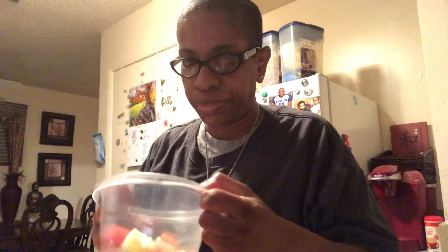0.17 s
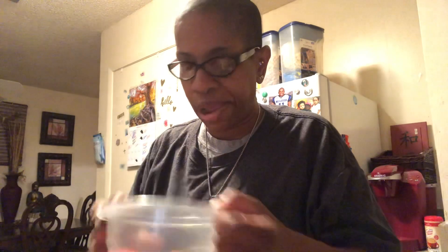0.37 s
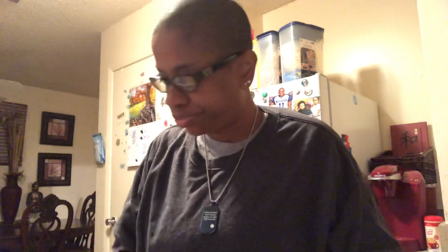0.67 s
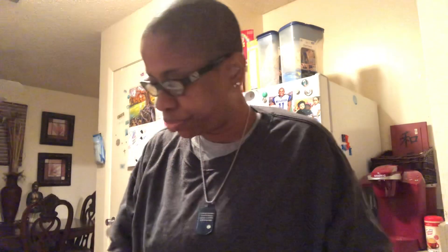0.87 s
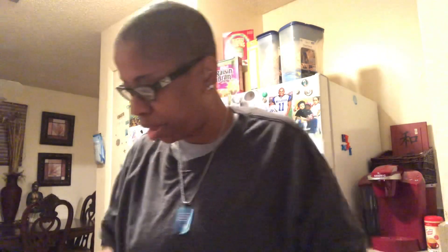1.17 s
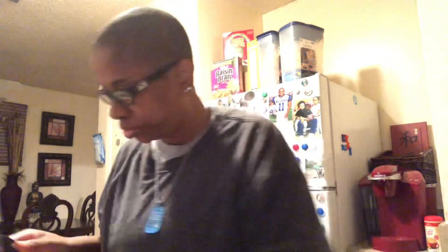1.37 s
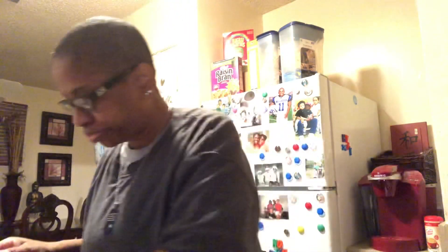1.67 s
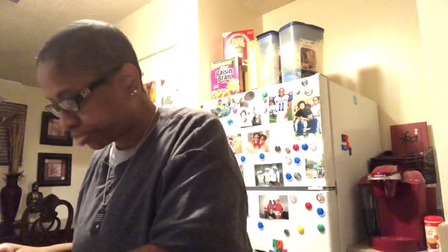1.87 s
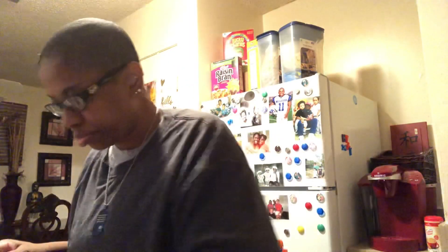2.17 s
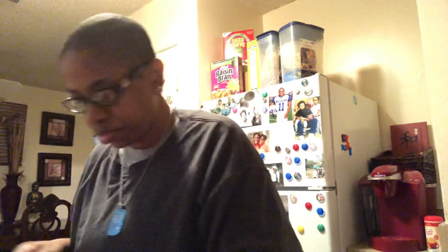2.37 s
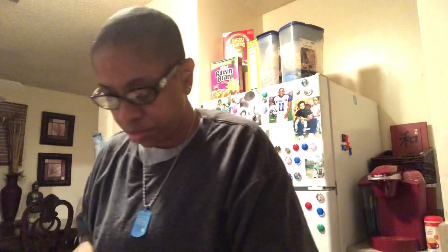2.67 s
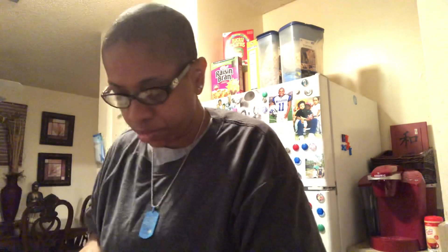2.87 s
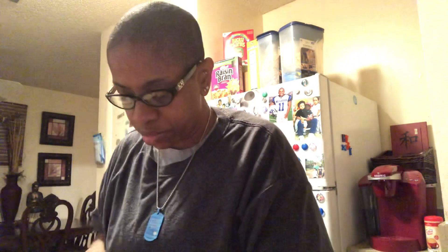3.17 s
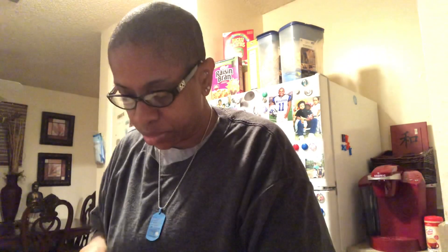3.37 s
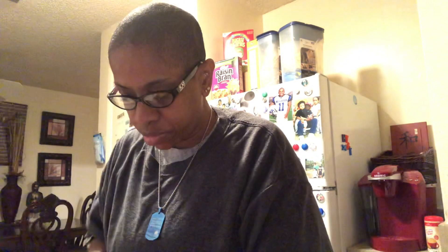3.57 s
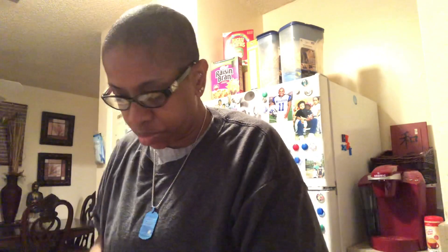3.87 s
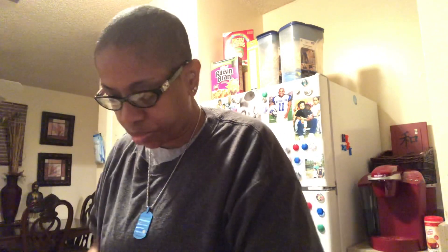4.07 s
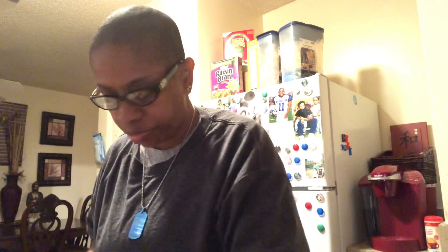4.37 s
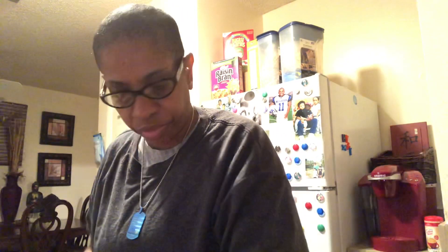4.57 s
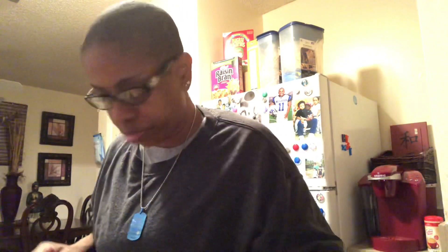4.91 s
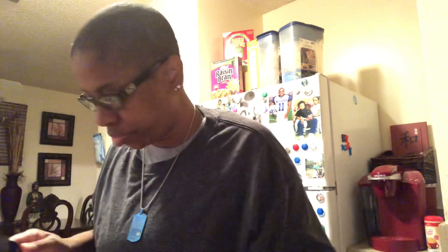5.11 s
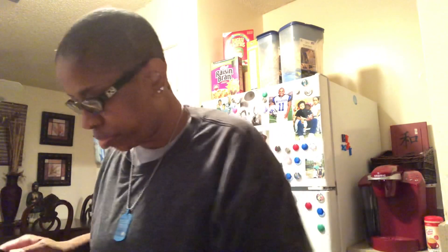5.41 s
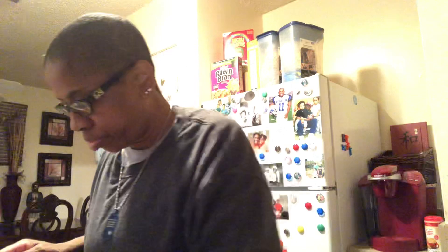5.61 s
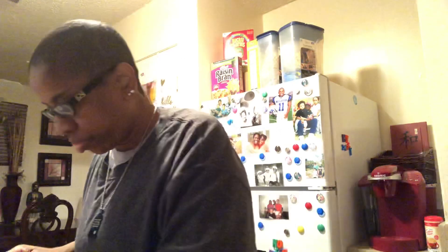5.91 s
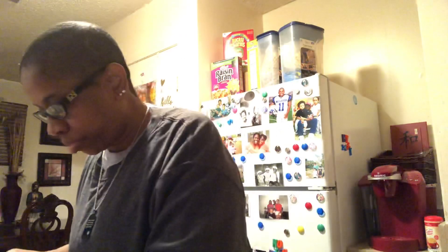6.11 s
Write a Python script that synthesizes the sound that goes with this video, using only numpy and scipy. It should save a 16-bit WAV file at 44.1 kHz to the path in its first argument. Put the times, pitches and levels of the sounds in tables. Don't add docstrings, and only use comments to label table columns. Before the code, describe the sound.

A microwave oven runs throughout in a small, lively kitchen: low electrical buzz, a steady fan tone and soft air rush. Lids tick faintly, then a plastic tub is set down with a short hollow knock. Light fingertip taps follow. Around the middle a hard object cracks loudly on the counter with a quick rattle of bounces, followed by soft plastic rubbing. Faint taps come near the end. A small, close microphone gives thin deep bass.

```python
import sys
import numpy as np
from scipy import signal
from scipy.fft import rfft, irfft
from scipy.io import wavfile
from scipy.ndimage import uniform_filter1d

SR = 44100
rng = np.random.default_rng(int(sys.argv[2]) if len(sys.argv) > 2 else 0)


def attenuation_scalar(level_db):
    decades = np.asarray(level_db, float) / 20
    return 10 ** decades


def wav_record(signal):
    frames = np.transpose(np.atleast_2d(signal))
    bounded = np.clip(frames, -1, 1)
    quanta = np.round(bounded * 32767).astype(np.int16)
    wavfile.write(sys.argv[1], SR, quanta)


N = 275625

MAINS_HZ = 60.007
# multiple of the mains, level in dB.
BUZZ_LINES = [(2, -41), (3, -51.5), (4, -41.5), (5, -64), (6, -56), (7, -60), (8, -60.5), (10, -64),
              (82, -84.5), (102, -92), (104, -82.5), (108, -83.5), (120, -89), (170, -89.5)]
# frequency in Hz, level in dB.
FAINT_LINES = [(600, -92), (1200, -96), (2500, -85), (4000, -86), (5500, -100), (7000, -102), (9000, -108),
               (11000, -109), (15500, -114)]
# frequency in Hz, level in dB.
FAN_TONES = [(157.08, -39), (314.16, -62), (570.5, -69), (706.9, -68), (785.4, -67), (826, -69),
             (1099.6, -67), (1256.7, -71)]

# start in seconds, crack level in dB, ring level in dB.
TUB_CONTACTS = [
    (.6770, -11, -7),
    (.6800, -14.5, -28),
    (.6842, -12.5, -19),
]
# start in seconds, crack level in dB, ring level in dB.
HARD_CONTACTS = [
    (3.4360, -35, -23),
    (3.4377, -7, -16),
    (3.4396, -8, -5.5),
    (3.4425, -20.5, -10.5),
    (3.4445, -15, -11),
    (3.454, -19, -17.5),
    (3.467, -37, -33),
]
# frequency in Hz, level in dB, 60 dB decay time in seconds.
TUB_MODES = [(360, -15.5, 0.045), (925, -19.5, 0.068), (2040, -12, 0.013), (2470, -2.5, 0.0068),
             (2720, -9, 0.0061), (3250, -7.5, 0.0082)]
# frequency in Hz, level in dB, 60 dB decay time in seconds.
HARD_MODES = [(350, 1.5, 0.032), (527, -2.5, 0.091), (1070, -13.5, 0.069), (1287, -7, 0.03),
              (1552, 5, 0.017), (2270, -5, 0.0084), (3590, -1, 0.0086)]
# frequency in Hz, level in dB per Hz.
TUB_CRACK_SPECTRUM = [(80, -19), (300, 0.5), (650, -1), (1500, -6.5), (2600, -4.5), (4500, -9.5),
                      (7800, -17.5), (9000, -23.5), (16000, -28)]
# frequency in Hz, level in dB per Hz.
HARD_CRACK_SPECTRUM = [(80, -28), (300, 3), (750, -5.5), (1200, 2), (2500, -3), (3600, -9.5), (5000, -15),
                       (8000, -21), (10500, -35), (16000, -42)]
# start in seconds, strength in dB, extra level of the upper modes in dB.
COUNTER_THUDS = [(.683, -17, -1), (.749, -34, -7), (1.172, -48, -5), (1.602, -48, -14), (2.379, -41, -13),
                 (2.627, -47, -5), (3.103, -40, -14), (3.441, -23, -7), (3.892, -42, -8), (5.145, -44, -12),
                 (5.236, -41, -11)]
# frequency in Hz, level in dB, 60 dB decay time in seconds.
COUNTER_MODES = [(75.3, -11, 0.3), (108.8, 1, 0.14), (141.6, -10, 0.23), (181.4, -8, 0.14),
                 (240.3, 5.5, 0.072), (312, -24, 0.24)]

# start in seconds, peak level in dB, centre in Hz.
LID_TICKS = [(.2306, -36.5, 7650), (.2594, -47, 8700), (.3015, -48, 5800), (.312, -44, 6500),
             (.322, -46, 3380), (.3472, -56, 5000), (.877, -47, 3970), (1.067, -61, 11000),
             (1.099, -56, 10000), (1.108, -46, 6840), (1.177, -53, 4240), (1.361, -66, 10000),
             (1.6238, -52.5, 6760), (2.3741, -56, 5000), (3.103, -63, 7500), (5.117, -61, 12000),
             (5.238, -62, 8000), (6.235, -57, 9000)]
# start in seconds, peak level in dB, centre in Hz.
FINGER_TAPS = [
    (.8708, -36.5, 3450),
    (1.1599, -43.5, 2600),
    (5.2271, -43.5, 6300),
]
TICK_SPREAD, TICK_T60_S = 0.38, 0.023
TAP_SPREAD, TAP_T60_S = 1.3, 0.046
# start of full contact in seconds, hold in seconds, level in dB.
HAND_STROKES = [
    (1.29, .08, -74),
    (3.26, .04, -82),
    (3.335, .02, -72),
    (3.38, .01, -79),
    (3.43, .02, -56),
    (3.668, .095, -65.5),
    (3.86, .05, -73),
]
BRUSH_RISE_DB_PER_S, BRUSH_FALL_DB_PER_S = 260, 420
# start in seconds, length in seconds, centre in Hz,
# width in Hz, level in dB.
PLASTIC_SQUEAKS = [(2.599, 0.063, 3480, 300, -59), (3.329, 0.14, 7300, 1300, -64),
                   (3.64, .085, 9100, 300, -76), (3.722, .05, 10600, 400, -77),
                   (3.73, 0.071, 7300, 500, -72), (3.77, 0.031, 12200, 400, -82)]

# frequency in Hz, level in dB per Hz.
AIR_SPECTRUM = [(25, -42), (45, -5.5), (75, -6.5), (110, 3), (200, -4), (300, -6), (650, -12),
                (1300, -14.5), (2100, -18), (3000, -27), (4500, -29), (7500, -40.5), (10000, -44.5),
                (16000, -49.5)]
AIR_DB = -45.5
# frequency in Hz, width in Hz, lift in dB.
DUCT_RESONANCES = [(356.7, 99, 10), (547.7, 19.4, 10.5), (828.4, 25, 11), (1013, 400, 5), (1236, 16.6, 11),
                   (1693, 91, 9), (1865, 88, 8.5), (2390, 86, 5), (3336, 1100, 8.5), (5100, 440, 0),
                   (6600, 280, 5)]
# frequency in Hz, 60 dB decay time in seconds.
KITCHEN_DECAY = [(100, 0.55), (500, 0.51), (1200, 0.49), (3000, 0.37), (7000, 0.34), (10000, 0.27),
                 (15000, 0.25)]


def read(points, hz):
    f, value = np.transpose(points)
    return np.interp(np.log(hz + 1), np.log(f + 1), value)


def evened(x):
    return x / np.sqrt(np.mean(x ** 2) + 1e-20)


def add(mix, s, sound):
    part = mix[round(s * SR):][:len(sound)]
    part += sound[:len(part)]


def coloured(size, gain):
    spectrum = rfft(rng.standard_normal(size)) * gain(np.fft.rfftfreq(size, 1 / SR))
    return evened(irfft(spectrum, size))


def resonance(hz, centre, width):
    return 1 / (1 + (2 * (hz - centre) / width) ** 2)


def click(gain):
    log_gain = np.log(gain(abs(np.fft.fftfreq(4096, 1 / SR))) + 1e-5)
    pulse = np.fft.ifft(np.exp(np.conj(signal.hilbert(log_gain)))).real
    return pulse / abs(pulse).max()


def ring(modes, rise_s):
    t = np.arange(SR // 3) / SR
    x = np.zeros(len(t))
    for k, (hz, db, t60) in enumerate(modes):
        x += (-1) ** k * attenuation_scalar(db - 60 * t / t60) * np.sin(2 * np.pi * hz * t)
    x = x * (1 - np.exp(-t / rise_s)) ** 2
    return x / abs(x).max()


def echoed(x, room_db):
    taps = np.zeros(SR // 3)
    at = np.arange(120, len(taps) - 12, 12)
    taps[at + rng.integers(0, 12, len(at))] = rng.choice([-1., 1.], len(at))
    hz, t, z = signal.stft(taps, SR, nperseg=256)
    decay = attenuation_scalar(-60 * t / read(KITCHEN_DECAY, hz)[:, None])
    tail = signal.istft(z * decay, SR, nperseg=256)[1]
    tail = attenuation_scalar(room_db) * tail / np.linalg.norm(tail)
    return signal.fftconvolve(x, np.r_[1, tail[1:]])


def hum():
    order = np.arange(11, 262)
    faint_db = read(FAINT_LINES, order * MAINS_HZ) + 3.3 * rng.standard_normal(len(order))
    levels = dict(zip(order, faint_db))
    levels |= {round(k): db for k, db in BUZZ_LINES}
    turn, t = np.linspace(0, 1, 16385), np.arange(N) / SR
    cycle = sum(attenuation_scalar(db) * np.cos(2 * np.pi * (k * turn + rng.random())) for k, db in levels.items())
    buzz = np.interp(MAINS_HZ * t % 1, turn, cycle)
    fan = sum(attenuation_scalar(db) * np.cos(2 * np.pi * (hz * t + rng.random())) for hz, db in FAN_TONES)
    return np.sqrt(2) * (buzz + fan)


def knock(contacts, modes, crack, rattle_db, room_db):
    out, rings, t = np.zeros(N), np.zeros(N), np.arange(4096) / SR
    rattle_shape = np.exp(-t / 0.003) * np.minimum(t / 0.0006, 1)

    def colour(hz):
        return attenuation_scalar(read(crack, hz))

    for s, db, ring_db in contacts:
        add(out, s, attenuation_scalar(db) * echoed(click(colour), room_db))
        add(out, s, attenuation_scalar(db + rattle_db) * coloured(4096, colour) * rattle_shape)
        add(rings, s, attenuation_scalar(ring_db) * ring(modes, 0.0004))
    return out + echoed(rings, -20.5)[:N]


def thuds():
    out = np.zeros(N)
    for s, db, upper_db in COUNTER_THUDS:
        modes = [(hz, d + upper_db * (hz > 150), t60) for hz, d, t60 in COUNTER_MODES]
        add(out, s, attenuation_scalar(db + 7) * ring(modes, 0.0055))
    return out


def ticks():
    spikes, fizz, t = np.zeros(N), np.zeros(N), np.arange(4096) / SR
    kinds = (LID_TICKS, TICK_SPREAD, TICK_T60_S), (FINGER_TAPS, TAP_SPREAD, TAP_T60_S)
    for rows, spread, t60 in kinds:
        for s, db, centre in rows:
            def colour(hz):
                low_cut = (hz / 1500) ** 2 / (1 + (hz / 1500) ** 2)
                return low_cut * (0.027 + resonance(hz, centre, spread * centre))

            add(spikes, s, attenuation_scalar(db + 6.5) * click(colour))
            add(fizz, s, attenuation_scalar(db - 7 - 60 * t / t60) * coloured(4096, colour))
    return echoed(spikes, -5.0)[:N] + fizz


def brushes():
    t, strokes = np.arange(N) / SR, np.zeros(N)
    for s, hold, db in HAND_STROKES:
        rise_db = BRUSH_RISE_DB_PER_S * np.maximum(s - t, 0)
        fall_db = BRUSH_FALL_DB_PER_S * np.maximum(t - s - hold, 0)
        strokes += attenuation_scalar(db - rise_db - fall_db)
    hiss = coloured(N, lambda hz: (hz / 6000) ** 2.5 / (1 + (hz / 6000) ** 4.5))
    grain_db = 1.7 * evened(uniform_filter1d(rng.standard_normal(N), 200))
    return strokes * hiss * attenuation_scalar(grain_db)


def squeaks():
    out = np.zeros(N)
    for s, length, centre, width, db in PLASTIC_SQUEAKS:
        squeak = coloured(8192, lambda hz: resonance(hz, centre, width))[:round(length * SR)]
        add(out, s, attenuation_scalar(db) * squeak * signal.windows.tukey(len(squeak), 0.7))
    return out


def air():
    frames, hz = N // 512 + 5, np.fft.rfftfreq(2048, 1 / SR)
    real, imag, patches = rng.standard_normal((frames, 1025, 3)).T
    patches = uniform_filter1d(patches, 20, 0)
    patches = evened(uniform_filter1d(patches, 6, 1))
    swell = evened(uniform_filter1d(rng.standard_normal(frames), 12))
    shape_db = read(AIR_SPECTRUM, hz)
    for centre, width, lift_db in DUCT_RESONANCES:
        shape_db = shape_db + lift_db * resonance(hz, centre, width)
    z = (real + 1j * imag) * attenuation_scalar(shape_db[:, None] + 0.71 * patches + 0.22 * swell)
    return attenuation_scalar(AIR_DB) * evened(signal.istft(z, nperseg=2048, noverlap=1536)[1][:N])


def scene():
    tub = knock(TUB_CONTACTS, TUB_MODES, TUB_CRACK_SPECTRUM, rattle_db=-9, room_db=-0.12)
    hard = knock(HARD_CONTACTS, HARD_MODES, HARD_CRACK_SPECTRUM, rattle_db=-2.5, room_db=2.26)
    handling = tub + hard + thuds() + ticks() + brushes() + squeaks()
    return (hum() + handling + air())[None]


def band_limit(x):
    return signal.sosfilt(signal.butter(12, 16500, fs=SR, output="sos"), x)


def record(dry):
    bass_cut = signal.butter(2, 45, "high", fs=SR, output="sos")
    top_cut = signal.firwin(511, 15900, window=("kaiser", 6), fs=SR)
    lean = signal.sosfilt(bass_cut, dry)
    lean = signal.oaconvolve(lean, top_cut[None], "same")
    return band_limit(lean)


dry = scene()
out = record(dry)
wav_record(out)
```